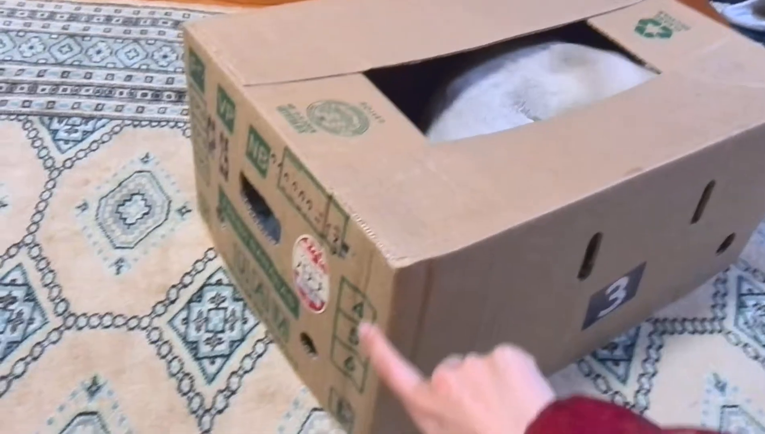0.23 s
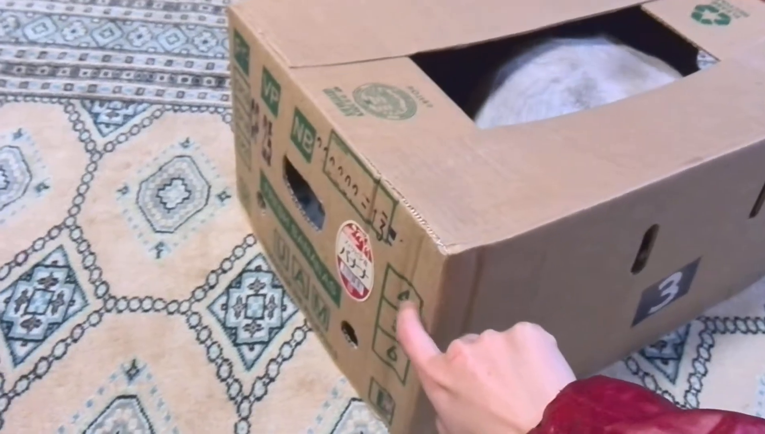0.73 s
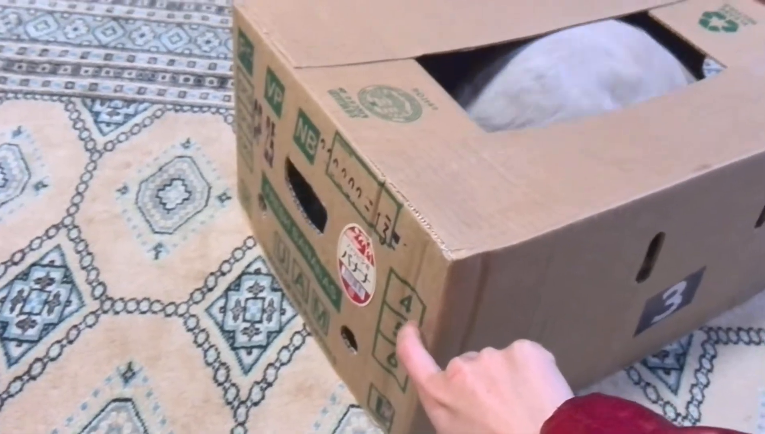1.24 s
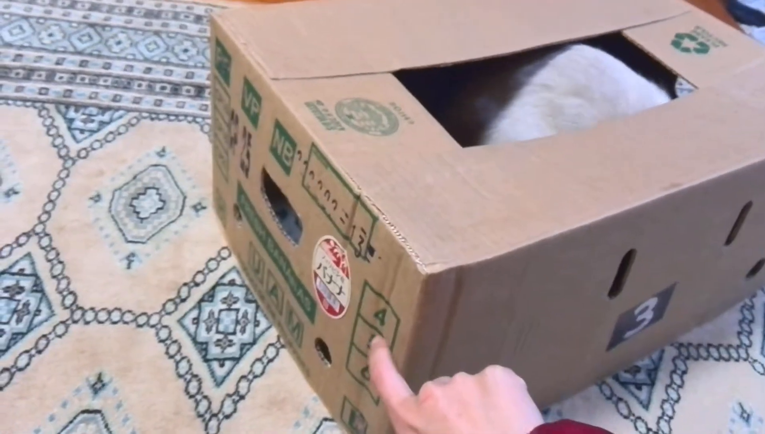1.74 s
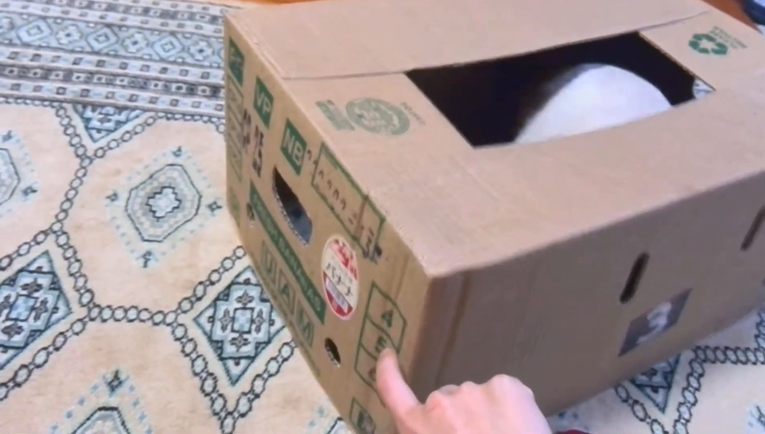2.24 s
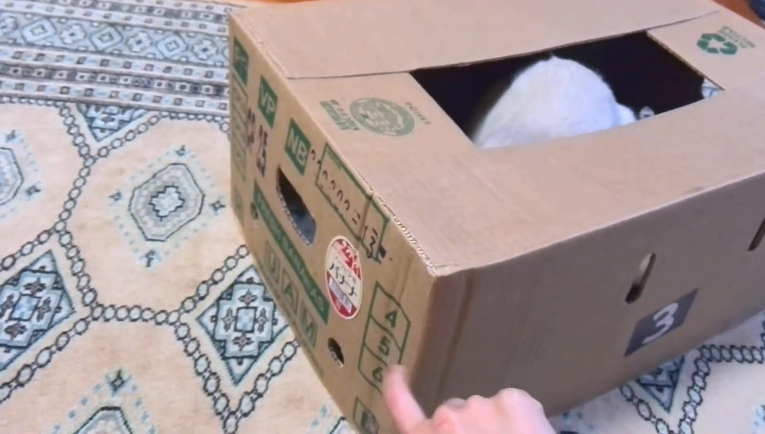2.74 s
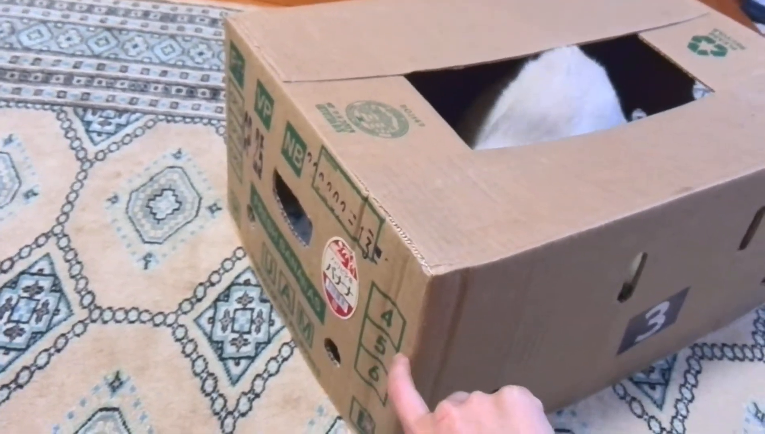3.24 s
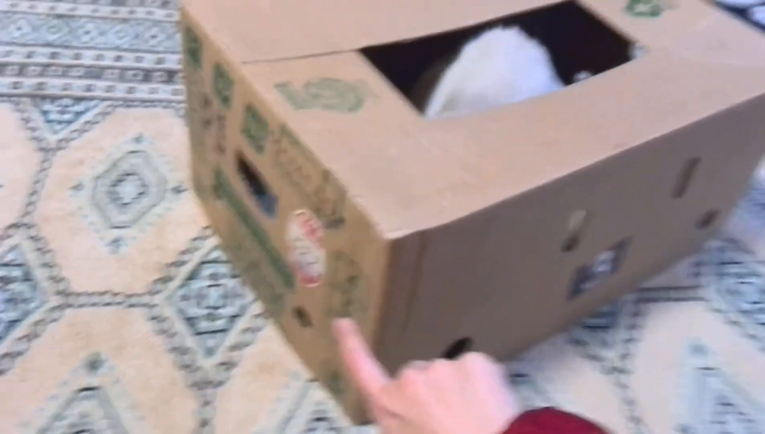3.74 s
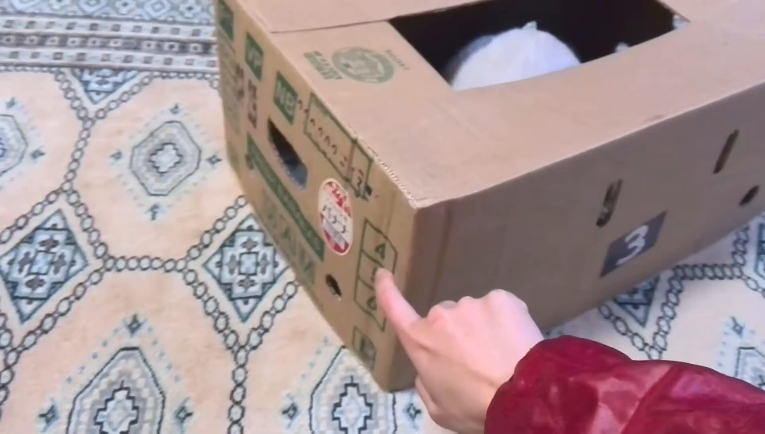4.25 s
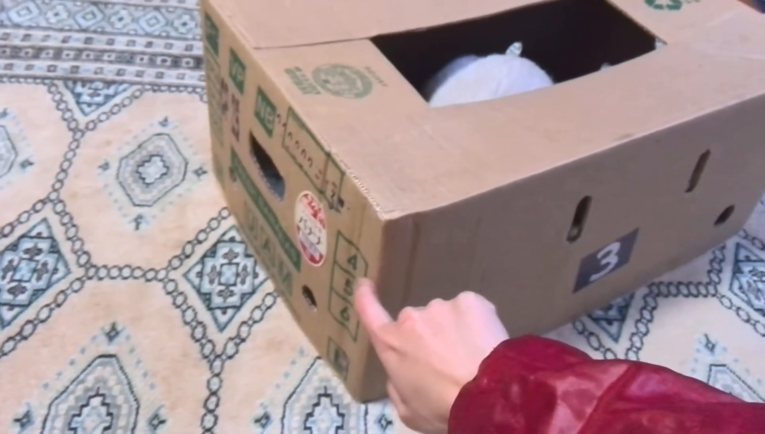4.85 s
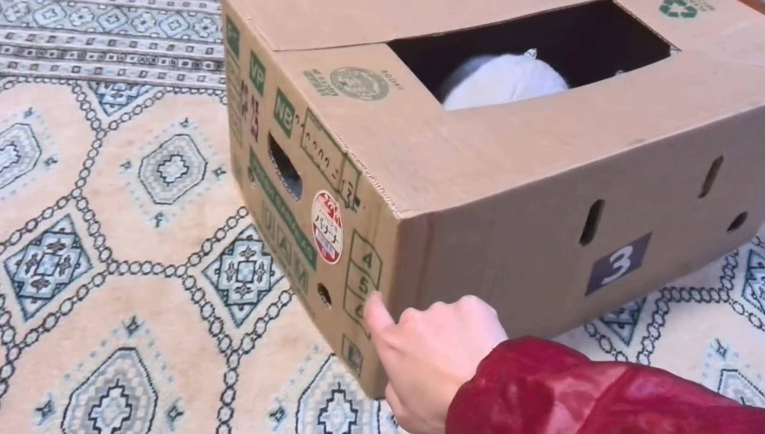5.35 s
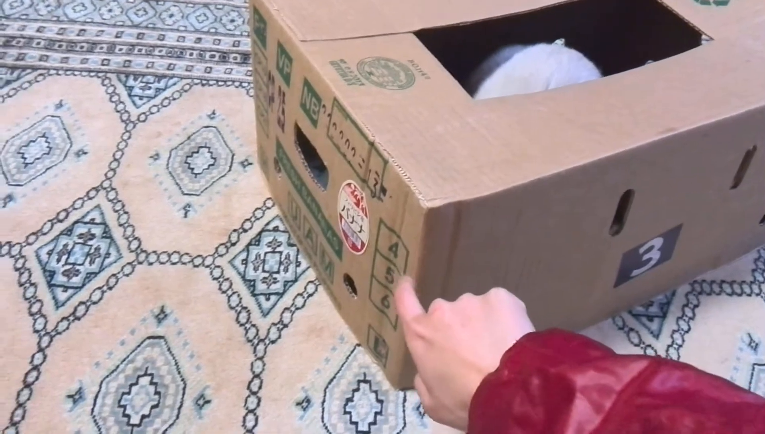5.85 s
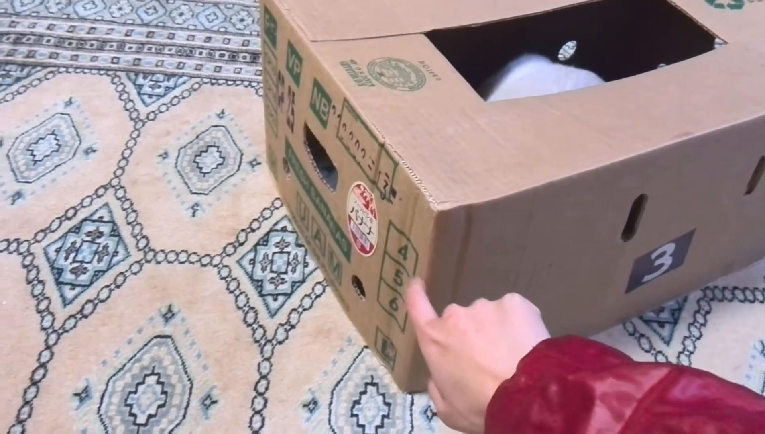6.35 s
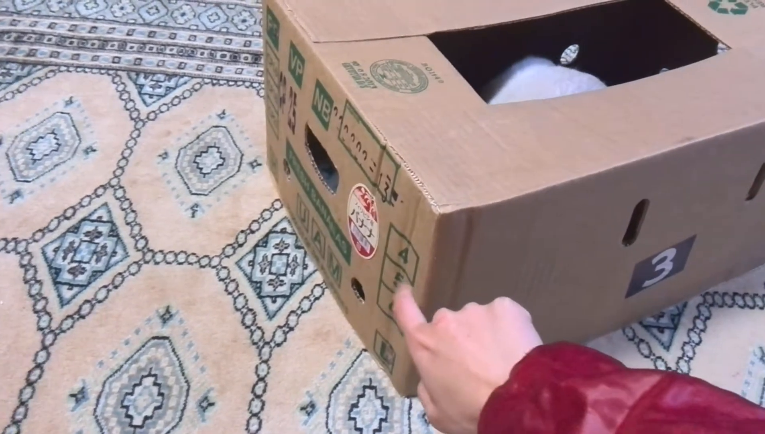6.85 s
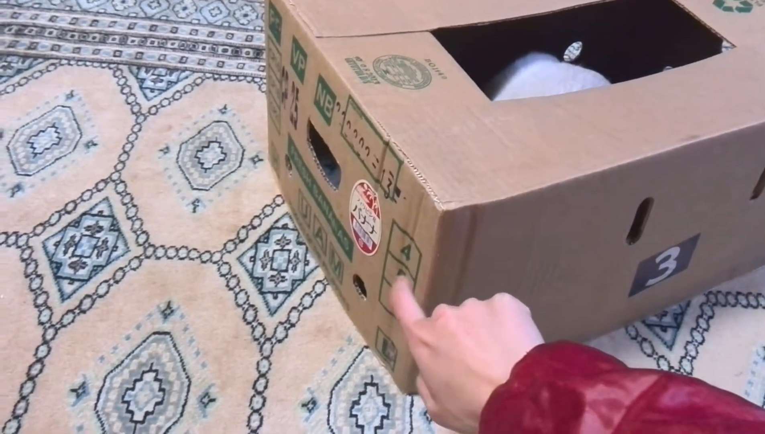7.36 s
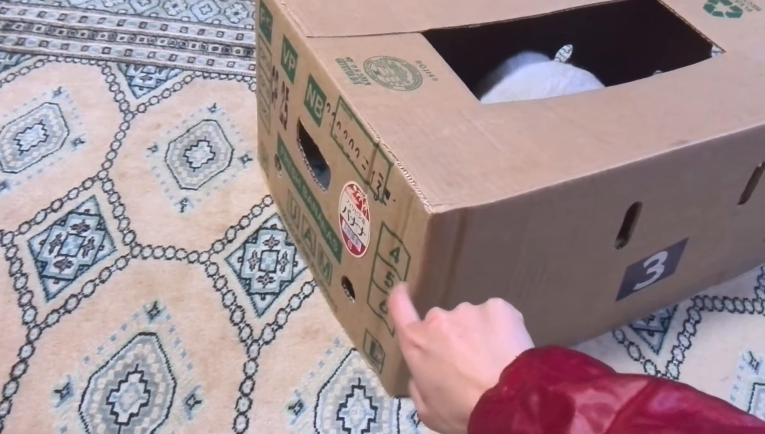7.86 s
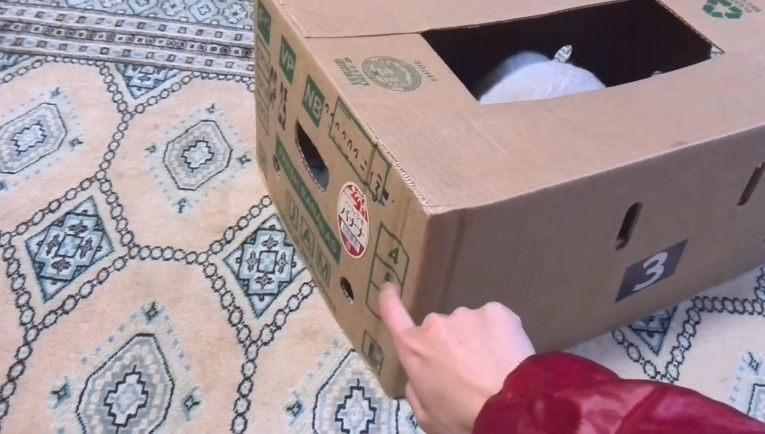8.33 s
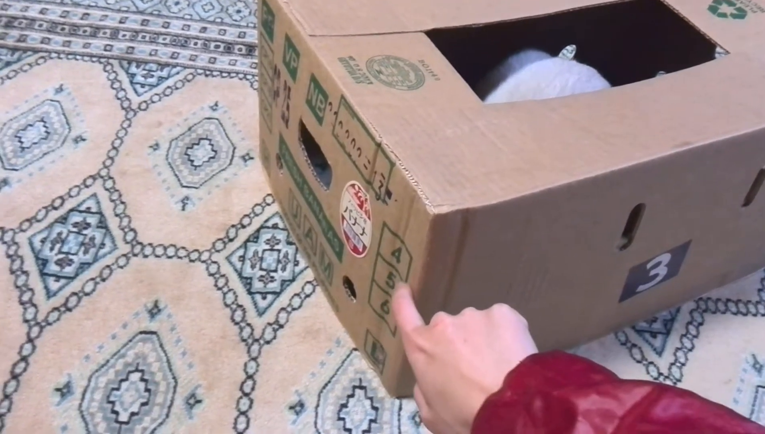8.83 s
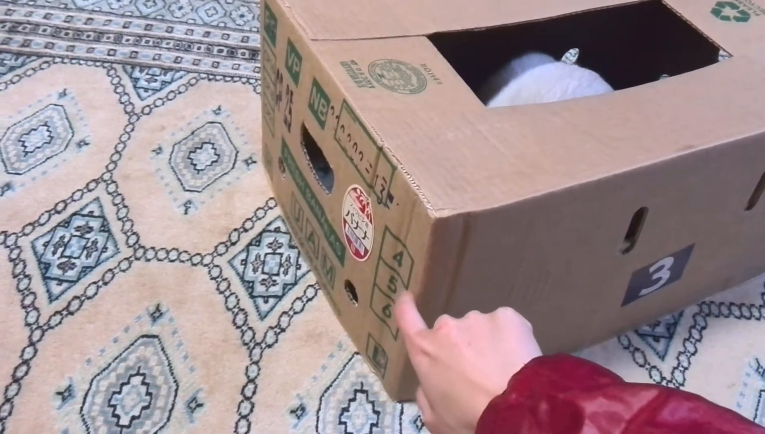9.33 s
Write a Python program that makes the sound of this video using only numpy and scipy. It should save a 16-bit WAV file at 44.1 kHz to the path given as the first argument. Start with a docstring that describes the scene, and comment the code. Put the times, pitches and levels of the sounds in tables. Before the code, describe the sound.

Close up in a quiet, furnished room, a finger taps and scratches a hollow cardboard box with a small animal moving inside. One sharp knock and scratch open, then soft taps, then another hard knock with a louder, rasping rustle of cardboard. After a short swish of cloth, small ticks, scrapes and irregular taps continue, growing lighter toward the end over faint microphone hiss.

```python
"""Tapping and scratching a cardboard box

A finger taps and scratches a box on a rug while a small animal shifts inside and cloth rustles.
Blows make the box ring, rubbing is a shower of tiny slips, and a furnished room echoes.
A close pair of microphones adds its hiss and a faint electronic whine."""
import sys
import numpy as np
from scipy import signal
from scipy.fft import rfft, irfft, next_fast_len
from scipy.io import wavfile
from scipy.ndimage import uniform_filter1d

SR = 44100
rng = np.random.default_rng(int(sys.argv[2]) if len(sys.argv) > 2 else 0)


def digitize_waveform(pressure):
    """Quantize a signal to 16-bit integers and store it at the path in sys.argv[1].

    Rows of a 2-D input are taken as channels; values are limited to [-1, 1].
    """
    field = np.atleast_2d(pressure).T
    bounded = np.clip(field, -1, 1)
    quanta = np.round(bounded * 32767).astype(np.int16)
    wavfile.write(sys.argv[1], SR, quanta)


N = 422919

# How alike the two sides are for sound from all around. Each row: pitch in Hz, likeness from 0 to 1.
LIKENESS = [(60, 0.99), (130, 1), (290, 0.72), (630, 0.), (15000, 0.)]


def box_blows():
    """Each blow hits, then chatters briefly, ringing the air inside the box, its panels and a corner."""
    # The blows. Each row: start in seconds, corner, panel and air levels in dB, panel pitch in Hz.
    hits = [(0.204, -17, -25.5, -39, 346), (0.544, -53, -50, -55, 208), (0.712, -47, -50, -48.5, 208),
            (0.875, -53.5, -54, -55, 215), (1.062, -56, -55, -76, 202), (1.13, -60, -54.5, -57, 170),
            (1.368, -62, -53, -62, 186), (1.459, -57, -28.5, -38.5, 223), (1.903, -53.5, -53, -54.5, 207),
            (2.213, -70, -30, -48, 251), (2.222, -15, -34.5, -59, 250), (2.243, -32, -45, -48, 228.6),
            (2.326, -57, -41, -40, 161), (2.411, -50, -45.5, -45, 458), (2.638, -46, -47.5, -54, 217),
            (2.753, -38.5, -79, -73, 549), (2.814, -41, -75, -62, 471), (3.023, -46, -43.5, -54.5, 233),
            (3.27, -57, -54.5, -62, 207), (3.954, -55, -52, -55, 178), (4.544, -68, -61, -70, 175),
            (5.147, -52, -66, -68, 162), (5.22, -70, -61, -63, 161), (6.087, -57, -55.5, -68, 213),
            (6.206, -56, -45, -51, 197), (6.247, -53, -51, -60, 242), (6.575, -75, -57, -50, 161),
            (6.594, -36, -38, -47, 340), (6.666, -53, -45.5, -43.5, 203), (6.8, -55, -49, -67, 215),
            (6.899, -81, -58, -47, 221), (7, -72, -63.5, -50, 176), (7.141, -54, -49.5, -55.5, 207),
            (7.347, -41, -45, -44.5, 205), (7.519, -40, -37, -63, 220), (7.55, -45, -58, -65, 400),
            (7.599, -42, -46.5, -67, 236), (7.694, -47.5, -43, -53.5, 208), (7.878, -53, -52, -51, 330),
            (8.086, -61, -54, -75, 213), (8.148, -77, -53.5, -60, 191), (8.265, -41, -39, -53, 293),
            (8.45, -50, -42.5, -52, 210), (8.826, -54, -50.5, -53, 210), (9.029, -55.5, -52.5, -50.5, 220),
            (9.227, -62, -54.5, -63, 170), (9.395, -57, -49.5, -51, 208)]
    # The tones of each part. Each row: pitch in Hz, relative level in dB, seconds to fade by 60 dB.
    air_tones = [(51.7, 1, 0.11), (68.6, -8, 0.092), (89, 13.5, 0.068), (90.6, -4.5, 0.26),
                 (141, 7.5, 0.11)]
    panel_tones = [(138, 4, 0.022), (186, -0.5, 0.03), (205, -1.5, 0.11), (233, 2, 0.067),
                   (267, -5.5, 0.06), (302.5, 1, 0.059), (337.3, 3.5, 0.085), (392.5, 2, 0.05),
                   (420, -10, 0.062), (560, -15, 0.066), (704, -4, 0.051)]
    corner_tones = [(824, -1, 0.022), (1031, -10.5, 0.097), (1066, -31, 0.067), (1150, 16.5, 0.014),
                    (1293, 14, 0.013), (1512, -3.5, 0.024), (1900, 11.5, 0.0098), (2070, 9.5, 0.011),
                    (2330, -16, .03)]
    out, t = np.zeros(N), np.arange(4096) / SR
    impact, chatter_s = t == 0, 0.023
    for start, corner_db, panel_db, air_db, panel_hz in hits:
        chatter = rng.standard_normal(len(t)) * np.exp(-(t / chatter_s) ** 3)
        thump = ring(air_tones, impact + 0.021 * chatter, rise_s=0.0067)
        # a blow that hardly knocks the corner comes from something padded, which presses longer
        padding_s = np.clip(0.00009 * (panel_db - corner_db), 0, 0.005)
        soft_push = np.convolve(impact + 0.038 * chatter, np.hanning(11 + round(padding_s * SR)))
        panel = ring(panel_tones, soft_push, rise_s=0.0024, centre_hz=panel_hz)
        knock = ring(corner_tones, impact + 0.019 * chatter, rise_s=0.0023)
        for db, sound in (air_db, thump), (panel_db, panel), (corner_db, knock):
            add(out, start, gain_of(db) * sound)
    return out * np.ones((2, 1))


def ring(tones, push, rise_s, centre_hz=None, spread_db=3.5):
    """A push sets fading tones ringing. Each blow lands somewhere new, so their mix varies. Peak is 1."""
    hz, db, fade_s = np.transpose(tones)[:, :, None]
    level_luck, pitch_luck = rng.standard_normal((2, len(tones), 1))
    t = np.arange(SR // 5) / SR
    if centre_hz:
        db = db - 6.5 * np.log2(hz / centre_hz) ** 2  # tones near the struck panel's pitch ring most
    fades = gain_of(db + spread_db * level_luck - 60 * t / fade_s)
    waves = np.sin(2 * np.pi * hz * (1 + 0.011 * pitch_luck) * t)
    ringing = (fades * waves).sum(0) * (1 - np.exp(-t / rise_s))
    sound = signal.fftconvolve(ringing, push)
    return sound / abs(sound).max()


def snaps():
    """A nail, claw or fold snaps in a burst of noise: a sharp click, then a fading fizz."""
    # The snaps. Each row: start in seconds, relative level in dB, centre pitch in Hz,
    # seconds for the fizz to fade by 60 dB, left minus right in dB.
    bursts = [(0.2051, -24.5, 11500, 0.071, 2), (0.545, -48, 8560, 0.06, 10), (0.7125, -44, 3360, 0.16, 8),
              (0.875, -44, 8500, 0.12, 6), (1.4634, -43, 6700, 0.1, 5), (1.904, -42.5, 8900, 0.24, 4),
              (2.221, -19.5, 3380, 0.069, 6.5), (2.2937, -23.5, 8700, 0.13, 8),
              (2.4693, -31, 3350, 0.14, 15), (2.4994, -39, 6600, 0.051, -3), (2.5349, -21.5, 3530, 0.1, 10),
              (2.6381, -19.5, 9300, 0.017, 14), (3.023, -55, 9700, 0.077, 6),
              (3.268, -44, 13200, 0.072, -1), (4.354, -41.5, 8700, 0.045, 15),
              (4.368, -42, 9350, 0.044, 11), (4.3825, -33, 9000, 0.06, 10), (4.4012, -33, 9100, 0.12, 14),
              (4.4143, -30, 8900, 0.06, 14.5), (4.6087, -43, 3100, 0.069, 10), (4.635, -41, 8210, 0.054, 9),
              (5.3228, -41.5, 5400, 0.07, 2), (5.6114, -47, 7040, 0.06, 4), (5.627, -36, 6950, 0.06, 1),
              (6.208, -33, 9610, 0.12, 7), (6.336, -39, 3320, 0.078, -1), (6.5914, -35.5, 9000, 0.06, 17),
              (7.1393, -42.5, 9000, 0.18, 6), (7.3324, -43, 9000, 0.06, -2), (7.347, -17.5, 7100, 0.038, 4),
              (7.5106, -37, 11800, 0.09, 11), (7.517, -34, 3050, 0.066, 6.0), (7.5228, -41, 3160, 0.06, 0),
              (7.534, -28, 11900, 0.06, 4), (7.5986, -25, 11400, 0.046, 6), (7.6166, -28, 12200, 0.06, 4),
              (7.606, -33, 11500, 0.035, 6), (7.639, -33, 8930, 0.053, 2), (7.9144, -54, 9700, 0.06, 2.5),
              (8.266, -40, 8750, 0.022, 15), (8.449, -37.5, 7200, 0.035, 7),
              (8.8237, -44.5, 9000, 0.095, 9), (9.0305, -43.5, 9200, 0.1, 1), (9.227, -50, 9600, 0.067, 14),
              (9.395, -46, 9620, 0.088, 4)]
    out, t = np.zeros((2, N)), np.arange(4096) / SR
    hz = np.fft.rfftfreq(len(t), 1 / SR)
    wide_band = 0.58 * hz ** 2 / (hz ** 2 + 1900 ** 2) / (1 + (hz / 11300) ** 4)
    click = gain_of(-60 * t / 0.007)
    for start, db, centre_hz, fade_s, pan_db in bursts:
        peak = np.exp(-(np.log((hz + 1) / centre_hz) / 0.16) ** 2)
        noise = irfft(rfft(rng.standard_normal((2, len(t)))) * (wide_band + peak))
        fizz = 0.68 * gain_of(-60 * t / fade_s)
        add(out, start, gain_of(db - 10) * evened(noise) * (click + fizz) * panned(pan_db)[:, None])
    return out


def rubbing():
    """Tiny uneven slips over fibres make the noise of scratched cardboard and brushing cloth."""
    # Strokes on the box. Each row: loudest moment in seconds, level in dB, rise and fall in seconds,
    # body and fine grain in dB compared with the hiss, left minus right in dB.
    strokes = [(0.21, -49, 0.0071, .1, 1, 0, 5), (0.272, -44.5, 0.039, 0.093, 0, -3, -3),
               (0.296, -38.5, 0.045, 0.012, -10, -1, 6), (0.42, -59.5, .3, 0.094, -6.5, -0.5, 5),
               (0.547, -59, .005, 0.11, -4, -0.5, 6), (1.464, -65.5, 0.04, 0.086, -3, 8, 10),
               (2.221, -50, 0.027, 0.2, 0, 4.5, 6), (2.293, -36, 0.061, 0.096, -5, -2, 5.5),
               (2.435, -48, 0.065, 0.024, 0.5, -1, 8), (2.474, -51, 0.015, 0.16, 4.5, 2, 3),
               (2.521, -40, 0.059, 0.054, -11.5, -5, 7.5), (2.648, -40.5, 0.022, 0.061, -3.5, -4, 6),
               (2.758, -53, 0.05, 0.049, -1, -5, 8), (2.835, -59.5, 0.081, 0.023, 1, -5, 8),
               (2.96, -64, 0.15, 0.19, -3, 1, 4), (4.406, -54.5, 0.06, 0.08, -1, -1, 1),
               (4.54, -65, 0.11, 0.43, 0, 1, 7.5), (4.634, -68, 0.048, .07, -9, -4, 2),
               (5.166, -56.5, 0.018, 0.031, -5, 2, 6), (5.31, -66.5, 0.2, 0.078, -8, -2, 6),
               (5.448, -63, .09, 0.15, -8, 0, 6), (5.633, -52.5, 0.018, 0.024, -10, -2, 7),
               (5.754, -68, 0.11, 0.061, -2, 5, 3.5), (6.209, -57.5, .01, 0.2, -13, -0.5, 5),
               (6.265, -58, 0.067, .045, 0, 1, 8), (6.36, -54.5, 0.022, .13, -6, 1, 4.5),
               (6.55, -65, 0.084, 0.091, -27, 6, 6), (6.594, -48.5, 0.0046, 0.022, -2, -12, 1),
               (6.69, -64, 0.2, 0.036, -7, -1, 4), (7.355, -58, 0.029, 0.063, 7, 10.5, 0),
               (7.516, -57.5, 0.0072, .05, 7.5, -1, 1), (7.538, -52, 0.026, 0.027, -8, -5, 11),
               (7.562, -53, 0.031, .01, 5.5, -3, 6), (7.605, -49, 0.012, 0.0092, -8, 3, 6),
               (7.622, -45, 0.0084, 0.026, -19, 3.5, 5), (7.638, -58, .03, .012, -13, 3, 1),
               (7.70, -57.5, 0.2, 0.1, -3.5, 3, 6), (7.89, -58.5, 0.075, 0.087, -1.5, 1, 5.5),
               (8.266, -53, 0.0026, 0.013, 0.5, -6, 2), (8.451, -59, 0.0061, .013, -1.5, 4, 8),
               (9.397, -56.5, 0.005, .03, -6, -1.5, 8)]
    # Cloth brushing as the arm moves. Each row: time in seconds, level in dB.
    cloth = [(3.48, -87), (3.568, -62), (3.764, -46.5), (3.848, -46.5), (3.934, -57.5), (3.996, -55.5),
             (4.166, -51.5), (4.21, -57), (4.33, -65)]
    # Tone colours: low body, bright hiss, very high grain. Each row: pitch in Hz, relative level in dB.
    body_colour = [(150, -5.5), (400, -1), (650, -4.5), (950, -0.5), (1200, 0.5), (1600, -0.5), (2000, -1),
                   (2700, -0.5), (3500, -42)]
    hiss_colour = [(1800, -64), (3000, 4.5), (3800, 4), (4800, 3.5), (6500, 6), (7600, 7.5), (9500, -59)]
    fine_colour = [(6500, -63), (8100, 3), (9800, 4), (11500, -2.5), (13000, -3), (15000, -4)]
    slips_per_s = 5000
    slip_sizes = gain_of(5 * np.minimum(rng.exponential(1, N), 6))
    slips = slip_sizes * (rng.random(N) < slips_per_s / SR)
    grain = uniform_filter1d(slips, 9)  # a slip lasts a fraction of a millisecond
    stutter = wobble(N, 200)  # the nail catches and lets go
    rough = surrounding_noise() * (2.6 + evened(grain)) * gain_of(1.1 * stutter)
    blended = rough + 0.15 * rough[::-1]  # some of the box's body reaches both microphones alike
    layers = coloured(rough, hiss_colour), coloured(blended, body_colour), coloured(rough, fine_colour)
    out = np.zeros((2, N))

    def rub(start, level_db, body_db, fine_db, pan_db):
        """One movement mixes the three layers and follows a loudness curve."""
        hiss, body, fine = (layer[:, round(start * SR):][:, :len(level_db)] for layer in layers)
        high = (hiss + gain_of(fine_db) * fine) * panned(pan_db)[:, None]
        low = gain_of(body_db) * body * panned(0.2 * pan_db)[:, None]
        add(out, start, gain_of(level_db) * (high + low))

    for loudest_s, db, rise_s, fall_s, body_db, fine_db, pan_db in strokes:
        t, level_db = pressure(db, rise_s, fall_s)
        start = loudest_s + t[0]
        skipped = max(-round(start * SR), 0)  # samples before time zero
        rub(max(start, 0), level_db[skipped:], body_db, fine_db, pan_db)
    times, levels = np.transpose(cloth)
    cloth_db = np.interp(np.arange(times[0], times[-1], 1 / SR), times, levels)
    rub(times[0], cloth_db, body_db=-6, fine_db=-2.5, pan_db=5.5)
    return out


def rasps():
    """A nail or claw rasps on the fibres: rough noise around a pitch that glides with its speed."""
    # The rasps. Each row: loudest moment in seconds, level in dB, rise and fall in seconds,
    # pitch in Hz, glide in Hz per second.
    scrapes = [(0.274, -35, 0.044, 0.032, 11300, 0), (1.64, -63, 0.027, 0.024, 1900, -2),
               (3.97, -52, 0.027, 0.029, 1510, 0), (4.151, -62, .08, .06, 2990, -3),
               (5.17, -58, .03, 0.031, 7030, 0), (5.41, -60, .03, 0.083, 11500, -2),
               (5.44, -61.5, .05, .05, 6670, -2), (5.63, -52, 0.018, 0.022, 11300, 0),
               (5.752, -61, 0.043, 0.051, 7470, -2), (2.52, -34, 0.064, 0.061, 2012, 10006),
               (2.649, -36.5, 0.0065, 0.039, 2893, -5500), (5.631, -50.5, .025, 0.018, 5960, -2),
               (6.343, -53.5, .012, 0.089, 2260, 4000), (7.354, -47.5, .02, 0.1, 5960, -4000)]
    out = np.zeros((2, N))
    for loudest_s, db, rise_s, fall_s, hz, glide in scrapes:
        t, level_db = pressure(db, rise_s, fall_s)
        tone = np.exp(2j * np.pi * np.cumsum(hz + glide * t) / SR)
        noise = rng.standard_normal((SR // 2, 2, 2))[:len(t)] @ [1, 1j]
        low_pass = signal.butter(2, 340 + 0.049 * hz, fs=SR)
        roughness = signal.lfilter(*low_pass, noise, axis=0).T
        blended = roughness + 0.24 * roughness[::-1]  # each side gets a little of the other
        rasp = (blended * tone).real  # multiplying moves the noise up to the tone's pitch
        add(out, loudest_s + t[0], gain_of(level_db) * evened(rasp))
    return out


def pressure(db, rise_s, fall_s):
    """A stroke presses and eases: times around its peak, and levels 20 dB down at rise_s and fall_s."""
    t = np.arange(-2 * rise_s, 2 * fall_s, 1 / SR)
    from_peak = np.where(t < 0, -t / rise_s, t / fall_s)
    return t, db - 20 * from_peak ** 1.3


def room_echoes(x):
    """The room returns a dense tail of echoes, each pitch fading at its own speed."""
    # How long the room rings. Each row: pitch in Hz, seconds to fade by 60 dB.
    fade_times = [(100, 0.18), (400, 0.41), (1500, 0.47), (6000, 0.25), (14000, 0.077)]
    reflections = surrounding_noise()[:, :SR // 2] * (np.arange(SR // 2) > 250)  # a short gap first
    hz, t, bands = signal.stft(reflections, SR, nperseg=512)
    fades = gain_of(-60 * t / value_at(fade_times, hz)[:, None])
    tail = signal.istft(bands * fades, SR, nperseg=512)[1]
    return signal.fftconvolve(x.mean(0)[None], tail / np.linalg.norm(tail[0]), axes=1)[:, :N]


def background():
    """Room tone and microphone hiss swell a little, under thin electronic whines that waver in pitch."""
    # The colour of the room tone and hiss. Each row: pitch in Hz, relative level in dB.
    floor_colour = [(12, -19), (20, 11), (61, -7), (108, -2.5), (132, -11.5), (169, -8), (286, -18.5),
                    (319, -14.5), (540, -21.5), (966, -18), (1930, -18.5), (8620, -24.5), (9630, -19.5),
                    (13100, -27), (15000, -30.5)]
    # The whines. Each row: pitch in Hz, typical wander in Hz, level in dB.
    whines = [(3230, 10.55, -81), (9620, 16, -72), (12980, 34, -75)]
    swell, wander = wobble((2, N), 5000)
    floor = gain_of(-59.5) * coloured(surrounding_noise(), floor_colour)
    bass = signal.sosfiltfilt(signal.butter(2, 300, fs=SR, output="sos"), floor)
    out = gain_of(1.4 * swell) * bass + gain_of(0.45 * swell) * (floor - bass)
    side_offset = np.array([[0], [0.24]])  # the right side is about a quarter cycle ahead
    for hz, wander_hz, db in whines:
        cycles = np.cumsum(hz + wander_hz * wander) / SR + rng.random() + side_offset
        out += gain_of(db) * evened(np.sin(2 * np.pi * cycles))
    return out


def shaded(x):
    """The case shades its two microphones differently at each pitch; long, low waves pass around it."""
    # The shading. Each row: pitch in Hz, left minus right in dB before the bass is evened out.
    shade = [(60, 4), (110, -1), (200, 7), (380, -4), (690, -1), (1280, 0), (2350, 5), (4330, -7.5),
             (7990, -3.5), (10500, 4), (14700, 1.5)]
    size = next_fast_len(N)
    hz = np.fft.rfftfreq(size, 1 / SR)
    balance_db = value_at(shade, hz) * (1 - value_at(LIKENESS, hz))
    return irfft(rfft(x, size) * panned(balance_db), size)[:, :N]


def surrounding_noise():
    """Noise from all around: left and right are alike in the bass and unrelated in the treble."""
    size = next_fast_len(N)
    likeness = value_at(LIKENESS, np.fft.rfftfreq(size, 1 / SR))
    left, other = rfft(rng.standard_normal((2, size)))
    right = likeness * left + np.sqrt(1 - likeness ** 2) * other
    return irfft(np.array([left, right]), size)[:, :N]


def coloured(x, colour):
    """Filters a sound by rows of pitch in Hz and level in dB, then sets its average power to 1."""
    size = next_fast_len(N)
    gains = gain_of(value_at(colour, np.fft.rfftfreq(size, 1 / SR)))
    return evened(irfft(rfft(x, size) * gains, size)[..., :N])


def wobble(shape, width):
    """A random drift: noise smoothed twice over `width` samples."""
    return evened(uniform_filter1d(uniform_filter1d(rng.standard_normal(shape), width), width))


def value_at(points, hz):
    """Looks up a value between the rows of a table, by pitch."""
    pitches, values = np.transpose(points)
    return np.interp(np.log(hz + 1), np.log(pitches + 1), values)


def add(mix, start, sound):
    """Mixes a sound in at a start time in seconds."""
    part = mix[..., round(start * SR):][..., :sound.shape[-1]]
    part += sound[..., :part.shape[-1]]


def panned(db):
    """Left and right gains that put the left side `db` above the right."""
    return gain_of(np.array([db / 2, -db / 2]))


def evened(x):
    """Scales a signal to an average power of 1."""
    return x / np.sqrt(np.mean(x ** 2) + 1e-20)


def gain_of(db):
    """Turns decibels into a multiplier."""
    return 10 ** (np.asarray(db) / 20)


def scene():
    """The box and the cloth, their echoes, and the background."""
    knocks, ticks, rubs, scrapes = box_blows(), snaps(), rubbing(), rasps()
    into_room = (gain_of(-9.5) * knocks + gain_of(-13) * ticks
                 + gain_of(-11) * rubs + gain_of(-12) * scrapes)
    return shaded(knocks + ticks + rubs + scrapes) + room_echoes(into_room) + background()


def record(dry):
    """The microphones drop the deepest bass, and the recorder drops the highest treble."""
    lowest_hz, highest_hz = 48, 14280
    thinned = signal.sosfilt(signal.butter(3, lowest_hz, "high", fs=SR, output="sos"), dry)
    low_pass = signal.firwin(255, highest_hz, window=("kaiser", 9), fs=SR)
    return signal.oaconvolve(thinned, low_pass[None], "same")


dry = scene()
out = record(dry)
digitize_waveform(out)
```